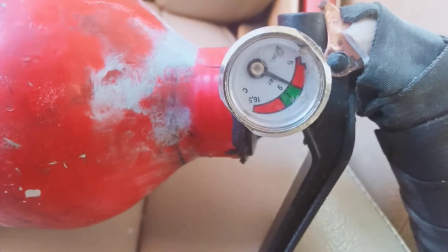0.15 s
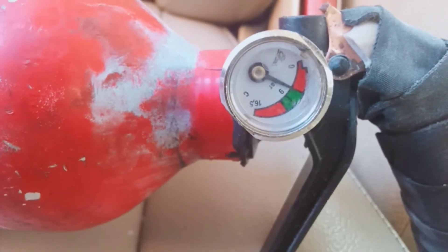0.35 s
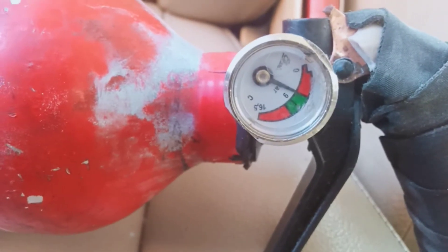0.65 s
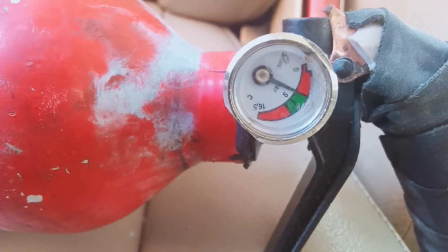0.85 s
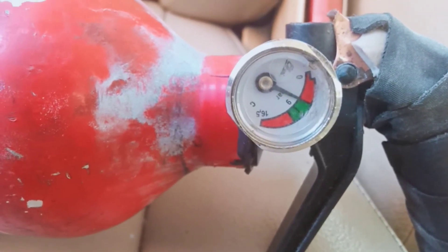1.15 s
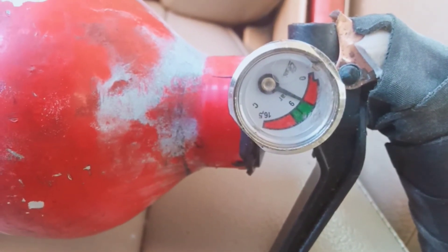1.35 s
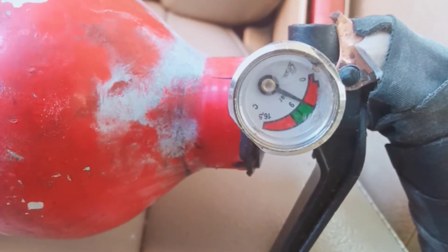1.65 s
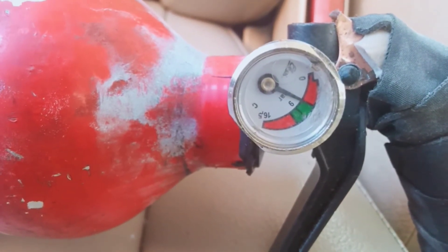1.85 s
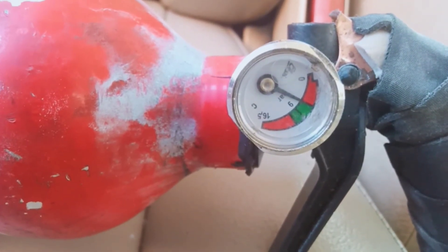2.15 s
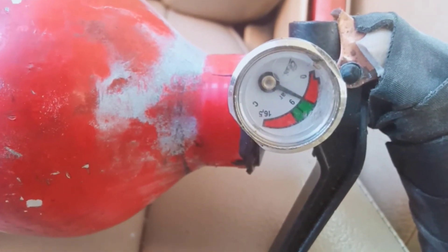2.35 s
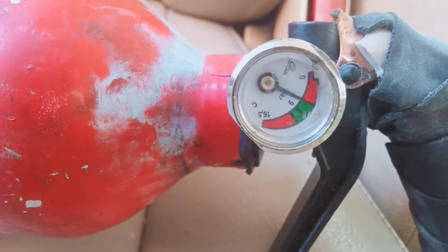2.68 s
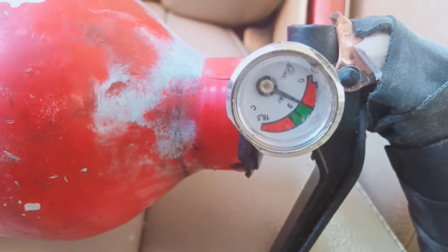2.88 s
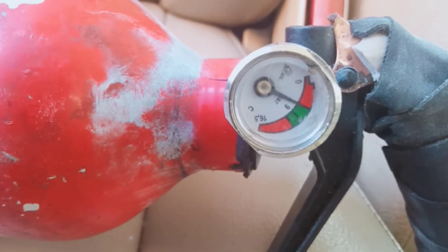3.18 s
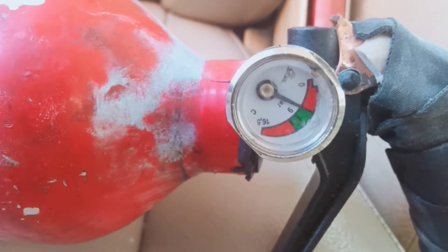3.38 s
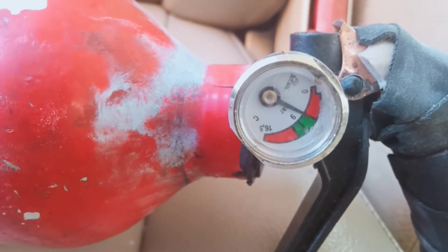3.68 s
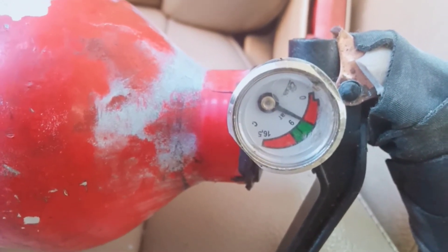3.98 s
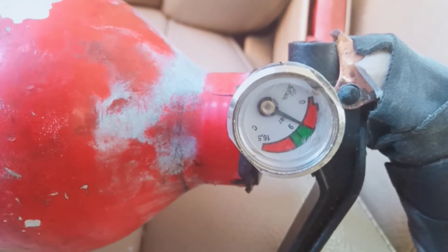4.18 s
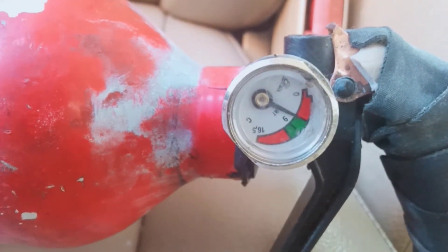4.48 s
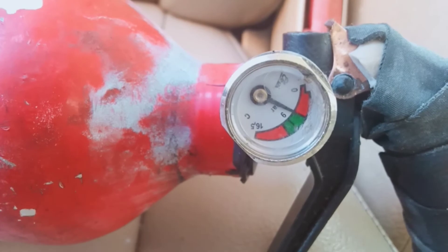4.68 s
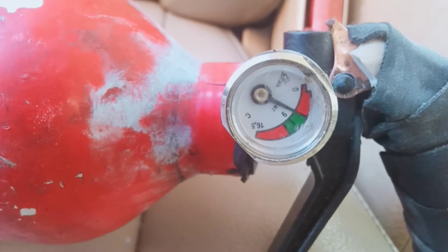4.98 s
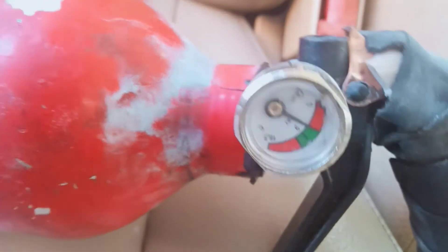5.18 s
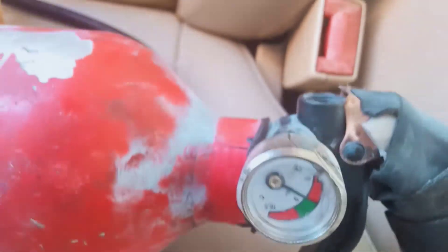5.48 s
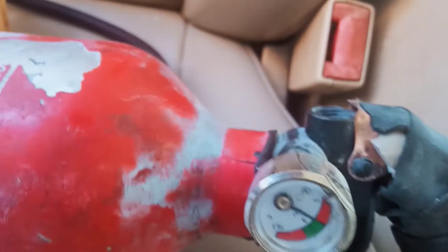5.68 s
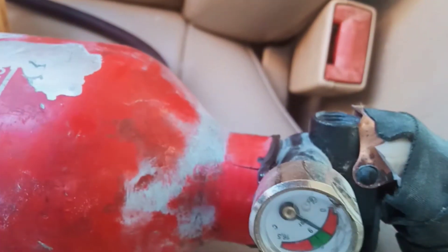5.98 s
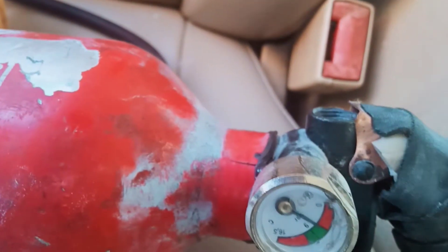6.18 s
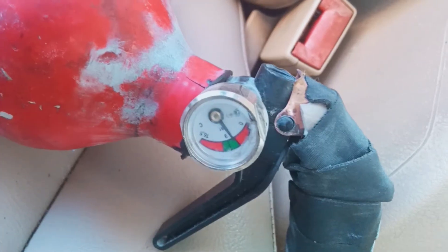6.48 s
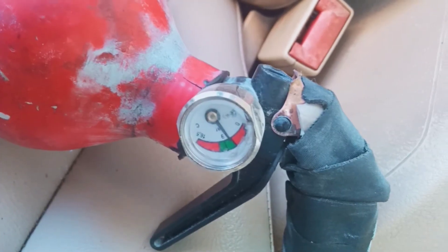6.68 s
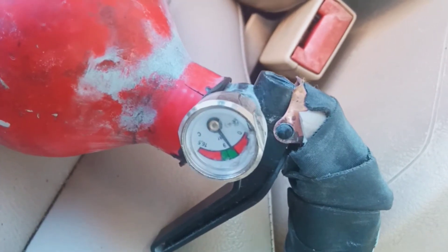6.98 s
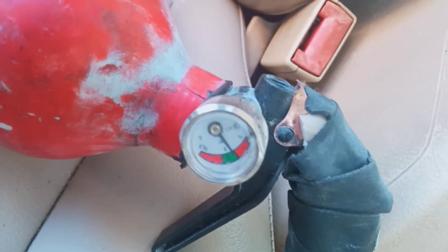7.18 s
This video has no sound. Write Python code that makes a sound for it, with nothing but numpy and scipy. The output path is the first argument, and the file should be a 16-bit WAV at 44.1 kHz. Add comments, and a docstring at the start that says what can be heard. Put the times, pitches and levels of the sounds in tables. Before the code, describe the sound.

From 0 s, already at full speed, a small electric piston compressor runs close to the microphone in a dry, upholstered car cabin. About sixty-one strokes per second merge into a rough, steady buzz, strongest around 600 to 700 Hz, with only tiny speed drift. Fast metallic knocks clatter at 1 to 5 kHz; a shrill, pulsing reed squeal near 6.4 kHz dominates the top, with bright air hiss and a faint motor and gear rush. The buzz grows very slightly. From about 5.2 s the squeal starts fading and the treble colour shifts subtly. At 6.15 s everything cuts to dead silence. At about 6.37 s the pump snaps back, almost the same pitch but slowing minutely: stronger buzz, rasping hiss and dry valve ticks, no squeal. Ticks harden briefly around 6.6 s, then it continues steadily to the end at about 7.3 s, without winding down.

```python
"""A small electric piston compressor fills a steel bottle inside a car, close to the microphone, at a nearly even speed.
Every turn brings a low puff of air (overtones of the crank speed), a few knocks of rod and piston (impulses
ringing casing, cylinder and head), and the ring and hiss of a reed valve (ringing modes and gated noise).
After a short dead silence it is heard at a higher pressure: the valve now rasps and ticks instead of squealing.
Behind it all lies a faint, steady rush of motor and gears."""
import sys
import numpy as np
from scipy import signal
from scipy.fft import rfft, irfft, next_fast_len
from scipy.io import wavfile
from scipy.ndimage import map_coordinates

SR = 44100
rng = np.random.default_rng(int(sys.argv[2]) if len(sys.argv) > 2 else 0)


def dump_mix(stems):
    """Bounce the given channels to the path in sys.argv[1] as a 16-bit WAV at rate SR."""
    frames = np.atleast_2d(stems).T  # one column per channel
    limited = np.clip(frames, -1, 1)  # hard clip at full scale
    pcm = np.round(limited * 32767).astype(np.int16)
    wavfile.write(sys.argv[1], SR, pcm)


N = 323694

# Levels in the tables are relative: each layer is brought to its own level afterwards.
# rush of motor and gears: [f/Hz, level/dB]
MOTOR_RUSH = [(20, -10.5), (50, -7), (120, -5.5), (300, -5.5), (450, -7), (660, -0.5), (950, -5.5),
              (1600, -6.5), (2100, -7.5), (2400, -11), (2800, -7), (3350, -12.5), (5000, -6.5),
              (8000, -27.5)]
# crank speed at low pressure: [t/s, speed/turns per s]
CRANK_SPEED_LOW = [(0.0, 60.53), (0.3, 60.79), (0.8, 60.63), (2.9, 60.66), (3.95, 60.37), (4.4, 60.61),
                   (5.1, 60.74), (5.7, 60.69), (6.15, 60.9)]
# crank speed at high pressure, slowed evenly by the load: [t/s, speed/turns per s]
CRANK_SPEED_HIGH = [(6.38, 61.14), (7.34, 60.89)]
# rod and piston contacts in one turn, low pressure:
# [crank angle/turns, casing level/dB, cylinder level/dB, head level/dB]
CONTACTS_LOW = [(0.072, -7, -6, -11), (0.266, -1, -15, -9), (0.341, 1, -11, -14), (0.44, -7, -3, 1),
                (0.509, -6, -1, -12), (0.605, -9, -2, -5), (0.834, -8, -5, -9), (0.952, -10, -11, -6)]
# the same contacts at high pressure, same columns and units
CONTACTS_HIGH = [(0.038, -7, -10, -5), (0.143, 2, -5, -8), (0.242, 1, -13, -13), (0.412, -4, -1, 0),
                 (0.461, -12, 2, -3), (0.599, -11, -8, -4), (0.713, -10, -6, -9), (0.891, -16, -12, -4)]
# ringing modes of the casing: [f/Hz, width/Hz, level/dB]
CASING_MODES = [(1100, 90, -1), (1280, 130, -2), (1530, 200, -1), (1720, 150, -3), (1880, 110, -4),
                (2050, 110, -1.5), (2270, 90, -8)]
# ringing modes of the cylinder: [f/Hz, width/Hz, level/dB]
CYLINDER_MODES = [(2690, 100, -3), (2800, 130, 0), (2930, 120, -2), (3100, 70, -7)]
# ringing modes of the head, low pressure: [f/Hz, width/Hz, level/dB]
HEAD_MODES_LOW = [(3900, 600, -17), (4450, 300, -10), (4800, 150, 0), (4990, 120, -13)]
# ringing modes of the head, high pressure: [f/Hz, width/Hz, level/dB]
HEAD_MODES_HIGH = [(4486, 180, 0.5), (4830, 110, 0)]
# spectrum of air through the valve, low pressure: [f/Hz, level/dB]
AIR_LOW = [(3000, -30), (5500, -4), (7000, 2), (7450, -3), (7750, 5), (8100, 5), (8330, -4), (8550, 0),
           (9350, -13), (10100, -2), (10550, -7), (11400, 4), (11800, -2), (12150, -1), (13400, -17),
           (14300, -14), (14900, -1), (15700, -12)]
# spectrum of air through the valve, high pressure: [f/Hz, level/dB]
AIR_HIGH = [(3000, -30), (5100, -10), (5600, 2), (6700, 8), (7650, -1), (8400, 0), (9550, -13), (10000, -9),
            (11400, -13), (11850, -11), (12150, -4), (12650, -8), (13700, -20), (15000, -15), (15450, -11)]
# air flow over one turn, low pressure: [crank angle/turns, rasp level/dB, fizz level/dB]
FLOW_LOW = [(.05, -1, -3), (.28, -5, -4.5), (.4, -2, -4), (.48, 3, -4), (.6, 0, -2), (.78, 1, 5),
            (.9, 0, 2)]
# air flow over one turn, high pressure: [crank angle/turns, rasp level/dB, fizz level/dB]
FLOW_HIGH = [(0, -2, -3), (.07, 1, 3), (.2, -1, -1), (.3, -2, -2), (.43, 2, -3), (.6, -1, -2), (.75, 0, 5),
             (.86, 1, 1)]
# puff through pump body and cabin, low pressure: [multiple of crank speed, level/dB]
PUFF_ORDERS_LOW = [(1, -22.5), (2, -11), (3, -12), (4, -9.5), (5, -8.5), (6, -19.5), (7, -15.5), (8, -17),
                   (9, -8), (10, -0.5), (11, 2), (12, -5), (13, -8), (14, -11), (15, -33), (16, -39.5)]
# puff through pump body and cabin, high pressure: [multiple of crank speed, level/dB]
PUFF_ORDERS_HIGH = [(1, -20), (2, -9.5), (3, -6), (4, -11.5), (5, -7.5), (6, -14), (7, -16.5), (8, -8.5),
                    (9, -4), (10, 2), (11, 6), (12, 3), (13, -12.5), (14, -10), (15, -22.5), (16, -47)]
# ringing modes of the outlet reed: [f/Hz, width/Hz, level/dB]
REED_MODES = [(5690, 130, -9), (6060, 170, -7.5), (6310, 230, -3.5), (6490, 200, 0)]
# change of colour as the microphone swings over the bottle: [f/Hz, gain/dB]
MICROPHONE_SWING = [(2900, 0), (3400, -3), (4300, 3), (4800, -3), (5500, 0), (7300, 0), (7800, 2),
                    (10000, 0), (11300, -3), (12200, 3), (13000, -1), (14700, -4), (15300, 0)]

T = np.arange(N) / SR
SIZE = next_fast_len(N + SR // 2, real=True)
HZ = np.fft.rfftfreq(SIZE, 1 / SR)
TOP_HZ = 15650

# base levels at low pressure (dB)
RUSH_LOW_DB, SLAP_LOW_DB, HISS_LOW_DB, CLATTER_LOW_DB = -34.5, -41, -30.5, -29.5
PUFF_LOW_DB, REED_DB = -21, -20
# the puff grows a little as the pressure builds
PUFF_GROWS_DB_PER_S = 0.13
# as the bottle fills the squeal begins to die away
SQUEAL_FADES_S, SQUEAL_FADE_DB_PER_S = 5.17, 2.5
# the reed catches the air now better, now worse: depth (dB) and random knots per second
CATCH_DB, CATCH_RATE = .3, 6
# base levels at high pressure (dB)
RUSH_HIGH_DB, TICK_HIGH_DB, HISS_HIGH_DB, PUFF_HIGH_DB = -39, -33.5, -27.5, -19.5
# a short spell of harder ticks: middle (s), half length to 1/e (s), rise (dB)
SPELL_S, SPELL_HALF_S, SPELL_DB = 6.63, 0.072, 4
# while the ticks are harder, puff and knocks are softer (dB)
SPELL_DIP_DB = 1.5


def amp(db):
    """Decibels to gain."""
    return 10 ** (np.asarray(db) / 20)


def unit(x):
    """Scale to rms 1."""
    return x / np.sqrt(np.mean(x ** 2) + 1e-20)


def curves(rows):
    """One value per sample for each column after the time."""
    s, *cols = np.transpose(rows)
    return [np.interp(T, s, c) for c in cols]


def wobble(rate):
    """A smooth random curve, rate knots a second."""
    knots = rng.standard_normal(int(N * rate / SR) + 4)
    return map_coordinates(knots, [T * rate])


def filtered(x, response):
    """x through a frequency response."""
    return irfft(rfft(x, SIZE) * response, SIZE)[:N]


def colour(points):
    """Gain of (Hz, dB) points on a log frequency axis."""
    hz, db = np.transpose(points)
    return amp(np.interp(np.log(HZ + 1), np.log(hz), db))


def causal(gain):
    """The minimum-phase response of this gain, which rings only after the blow."""
    cepstrum = irfft(np.log(gain + 1e-6), SIZE)
    cepstrum[1:SIZE // 2] *= 2
    cepstrum[SIZE // 2 + 1:] = 0
    return np.exp(rfft(cepstrum))


def resonances(modes):
    """Sum of damped resonators (Hz, width in Hz, dB) with alternating sign."""
    response = 0
    for k, (centre, width, db) in enumerate(modes):
        damping = 1j * HZ * width
        response = response + (-1) ** k * amp(db) * damping / (centre * centre - HZ * HZ + damping)
    return response


def crank_angle(speed, start):
    """Turns of the crank, summed from its speed; it stands at start at the first time of the table."""
    turns = np.cumsum(curves(speed)[0]) / SR
    return start + turns - np.interp(speed[0][0], T, turns)


def strokes(crank, angle, jitter_s, scatter_db):
    """One impulse each time the crank passes the angle, scattered in time and strength."""
    turns = np.arange(np.ceil(crank[0] - angle), crank[-1] - angle) + angle
    chance = rng.standard_normal((len(turns), 2))
    at = (np.interp(turns, crank, T) + jitter_s * chance[:, 0]) * SR
    # a windowed sinc places each impulse between samples
    taps = np.floor(at)[:, None] + np.arange(-7, 9)
    off = taps - at[:, None]
    pulse = np.sinc(off) * np.cos(np.pi * off / 16) ** 2
    strength = amp(scatter_db * chance[:, 1:])
    places = np.clip(taps, 0, N - 1).astype(int)
    return np.bincount(places.ravel(), (pulse * strength).ravel(), N)


def cabin(x):
    """Seats and trim return a short, dense echo: a noise tail falling 60 dB in 40 ms."""
    t = T[:SR // 10]
    tail = rng.standard_normal(len(t)) * amp(-60 * t / .04)
    echo = signal.fftconvolve(x, tail / np.linalg.norm(tail))[:N]
    return x + amp(-13) * echo


def motor_rush():
    """Motor and gears give a steady broadband rush: coloured noise of rms 1."""
    return unit(filtered(rng.standard_normal(N), colour(MOTOR_RUSH)))


def ticks(crank, angle, spectrum):
    """The valve slaps its seat and chatters for a moment, harder on some turns than others."""
    slaps = strokes(crank, angle, jitter_s=.00007, scatter_db=1.8)
    decay = amp(-60 * T[:SR // 100] / .007)  # 60 dB in 7 ms
    chatter = signal.fftconvolve(slaps, decay)[:N] * rng.standard_normal(N)
    softened = colour(spectrum) / (1 + (HZ / 9500) ** 4)
    return unit(filtered(chatter, causal(softened)))


def knocks(crank, contacts, head_modes, casing_db, cylinder_db, head_db):
    """Play in rod and piston is taken up at the same, slowly drifting angles and rings three metal parts."""
    blows = []
    for angle, *_ in contacts:
        drifting = crank + .0012 * wobble(1.2)
        blows.append(strokes(drifting, angle, jitter_s=.000015, scatter_db=1.2))
    # how hard each contact drives casing, cylinder and head
    drives = amp(np.array(contacts)[:, 1:]).T @ np.array(blows)
    all_modes = (CASING_MODES, CYLINDER_MODES, head_modes)
    clatter = 0
    for drive, modes, db in zip(drives, all_modes, (casing_db, cylinder_db, head_db)):
        ringing = filtered(drive, resonances(modes))
        clatter = clatter + amp(db) * unit(cabin(ringing))
    return clatter


def hiss(crank, flow, spectrum, fizz_db):
    """Turbulent air: coarse rasp and fine fizz swell at different angles of each turn."""
    angle, *levels = np.transpose(flow)
    streams = []
    for db in levels:
        swell_db = np.interp(crank, angle, db, period=1) + 0.99 * wobble(60)
        streams.append(amp(swell_db) * rng.standard_normal(N))
    rasp, fizz = streams
    high = 1 / (1 + (9000 / (HZ + 1)) ** 16)  # power share of the fizz, above 9 kHz
    air = colour(spectrum)
    low_air = filtered(rasp, air * np.sqrt(1 - high))
    high_air = filtered(fizz, air * np.sqrt(high))
    return unit(low_air + amp(fizz_db) * high_air)


def puff(crank, orders, opens, lasts, flutter_hz, push):
    """The intake reed flutters while open; body and cabin set the strength of each overtone."""
    speed = (crank[-1] - crank[0]) / T[-1]
    angle = np.linspace(0, 1, 512, endpoint=False)
    lift = np.clip((angle - opens) / lasts, 0, 1)  # progress through the opening
    flutter = np.sin(2 * np.pi * flutter_hz / speed * (angle - opens))
    flow = np.sqrt(np.abs(np.sin(np.pi * lift))) * (flutter + push * (1 - 2 * lift))
    # the flow sets the phase of each overtone, the table its strength
    phases = np.angle(rfft(flow))
    boom = 0
    for k, db in orders:
        order = round(k)
        boom = boom + amp(db) * np.cos(2 * np.pi * order * crank + phases[order])
    return unit(boom) * amp(.35 * wobble(30))


def squeal(crank, flutter_db, stop):
    """The outlet reed snaps open, then the escaping air keeps it ringing until the stroke ends."""
    reed = resonances(REED_MODES)
    opening = strokes(crank + .001 * wobble(6), .47, jitter_s=.000015, scatter_db=1.2)
    snap = unit(filtered(opening, reed * resonances([(6400, 500, 0)])))
    # air passes around 0.77 of a turn
    open_gate = np.exp(-(((crank - .77 + .5) % 1 - .5) / .18) ** 4)
    flutter = unit(filtered(rng.standard_normal(N) * open_gate, reed))
    swing = signal.hilbert(snap + amp(flutter_db) * flutter)
    # the reed's stop bounds its swing
    bounded = swing.real / np.sqrt(1 + (np.abs(swing) / stop) ** 2)
    return unit(cabin(bounded))


def low_pressure():
    """The valve stays open long and squeals; air that misses the reed escapes as hiss."""
    crank = crank_angle(CRANK_SPEED_LOW, .65)
    catch_db = CATCH_DB * wobble(CATCH_RATE)
    fade_db = SQUEAL_FADE_DB_PER_S * np.maximum(T - SQUEAL_FADES_S, 0)
    motor = amp(RUSH_LOW_DB) * motor_rush()
    slap = amp(SLAP_LOW_DB) * ticks(crank, .46, AIR_LOW)
    clatter = amp(CLATTER_LOW_DB) * knocks(crank, CONTACTS_LOW, HEAD_MODES_LOW,
                                           casing_db=-5.5, cylinder_db=-5.0, head_db=-4.0)
    leak = amp(HISS_LOW_DB - catch_db) * hiss(crank, FLOW_LOW, AIR_LOW, fizz_db=-1.0)
    boom = puff(crank, PUFF_ORDERS_LOW, opens=.05, lasts=.32, flutter_hz=755, push=.17)
    boom = amp(PUFF_LOW_DB + PUFF_GROWS_DB_PER_S * T) * boom
    ring = amp(REED_DB + catch_db - fade_db) * squeal(crank, flutter_db=0, stop=6.5)
    pump = motor + slap + clatter + leak + boom + ring
    # the microphone swings over the bottle
    moved = np.interp(T, [5.15, 5.45], [0, 1])
    return (1 - moved) * pump + moved * filtered(pump, colour(MICROPHONE_SWING))


def high_pressure():
    """Against more pressure the valve only ticks and rasps."""
    crank = crank_angle(CRANK_SPEED_HIGH, .223)
    spell = np.exp(-((T - SPELL_S) / SPELL_HALF_S) ** 2)
    motor = amp(RUSH_HIGH_DB) * motor_rush()
    slap = amp(TICK_HIGH_DB + SPELL_DB * spell) * ticks(crank, .035, AIR_HIGH)
    clatter = knocks(crank, CONTACTS_HIGH, HEAD_MODES_HIGH,
                     casing_db=-35.0, cylinder_db=-34.0, head_db=-32.5)
    rasp = amp(HISS_HIGH_DB) * hiss(crank, FLOW_HIGH, AIR_HIGH, fizz_db=1.5)
    boom = puff(crank, PUFF_ORDERS_HIGH, opens=.045, lasts=.4, flutter_hz=736, push=.07)
    boom = amp(PUFF_HIGH_DB) * boom
    return motor + slap + rasp + amp(-SPELL_DIP_DB * spell) * (clatter + boom)


def scene():
    """Two stretches of pumping with dead silence between them."""
    first = np.interp(T, [6.153, 6.155], [1, 0])
    # the second stretch enters faintly for some 10 ms, then fully
    second = np.interp(T, [6.364, 6.367, 6.375, 6.377], [0, .15, .15, 1])
    return (first * low_pressure() + second * high_pressure())[None]


def record(dry):
    """A steep low-pass keeps almost nothing above the band limit."""
    return np.array([filtered(x, 1 / (1 + (HZ / TOP_HZ) ** 200)) for x in dry])


dry = scene()
out = record(dry)
dump_mix(out)
```